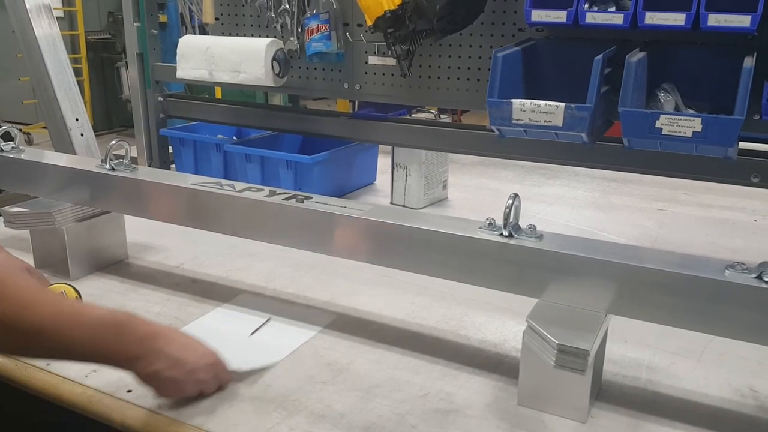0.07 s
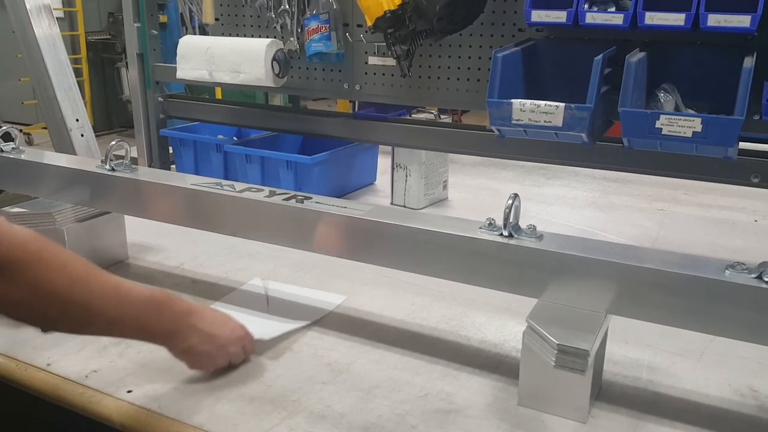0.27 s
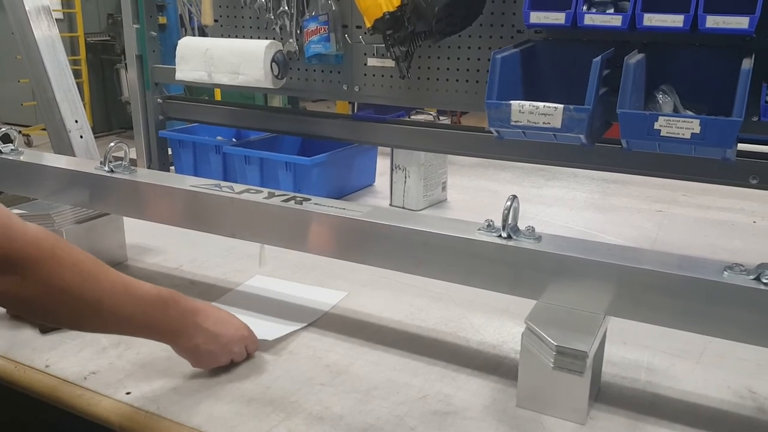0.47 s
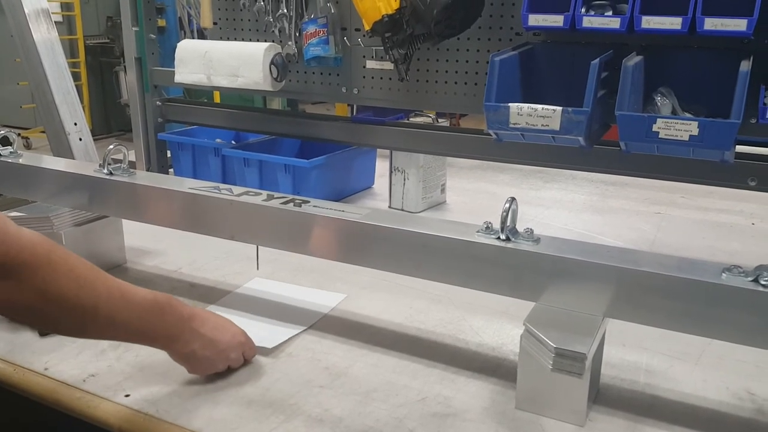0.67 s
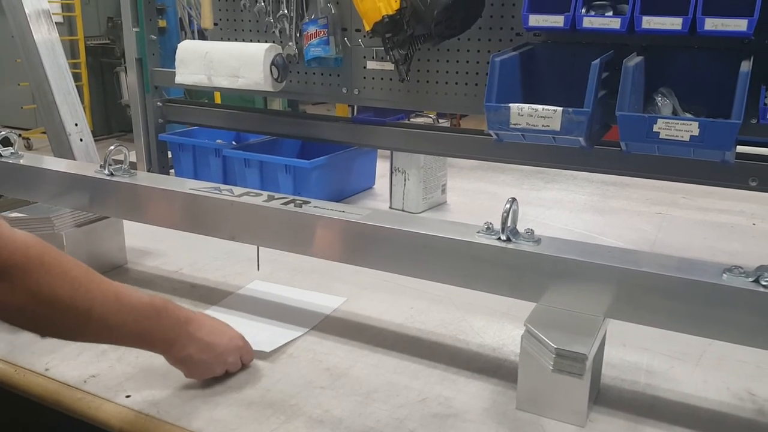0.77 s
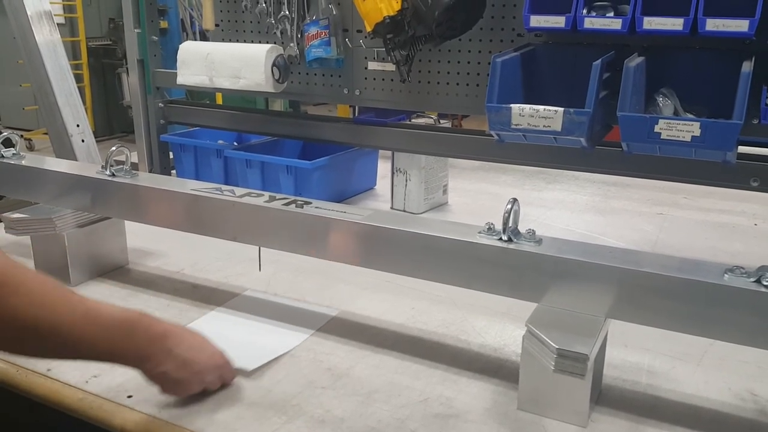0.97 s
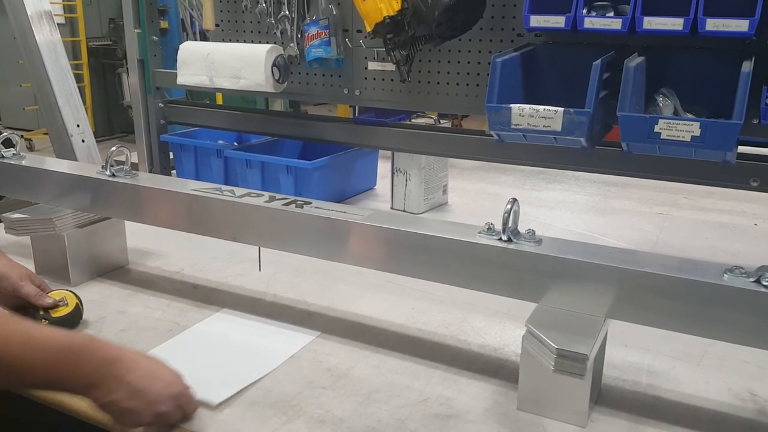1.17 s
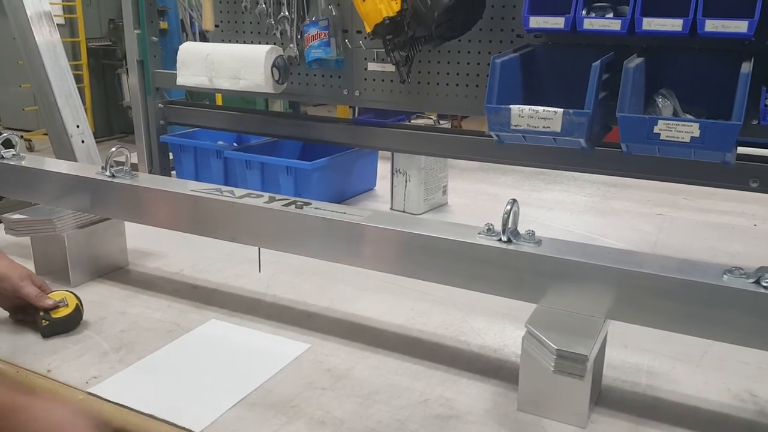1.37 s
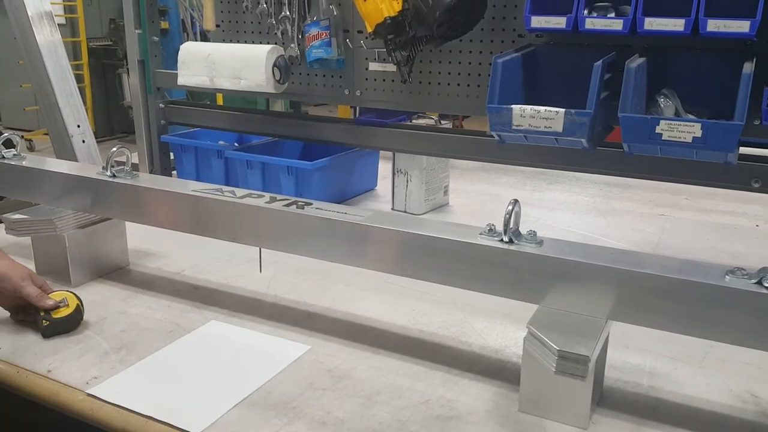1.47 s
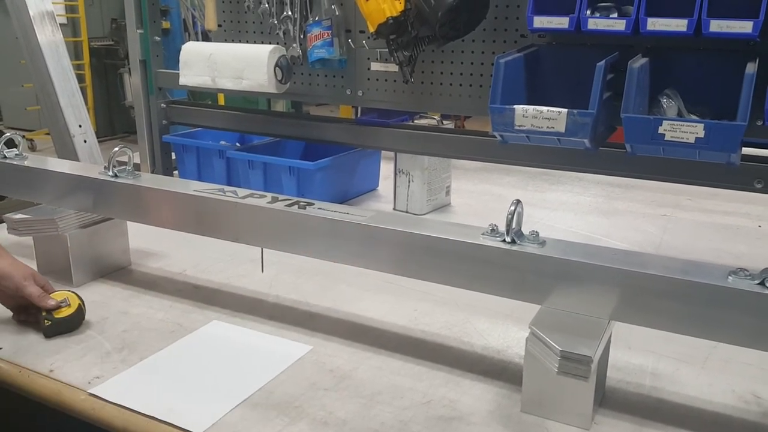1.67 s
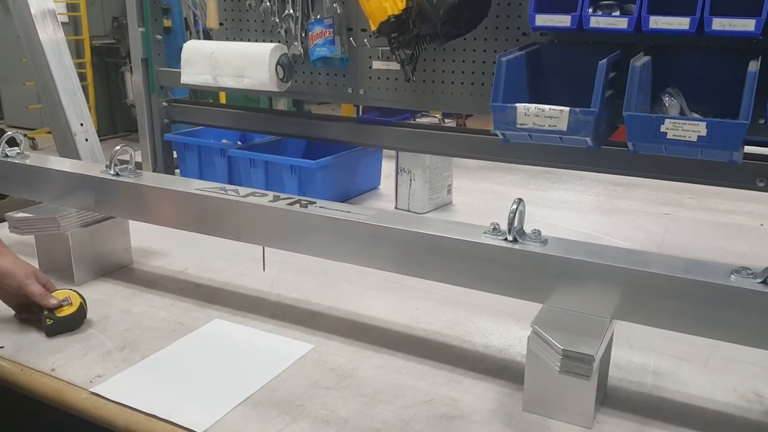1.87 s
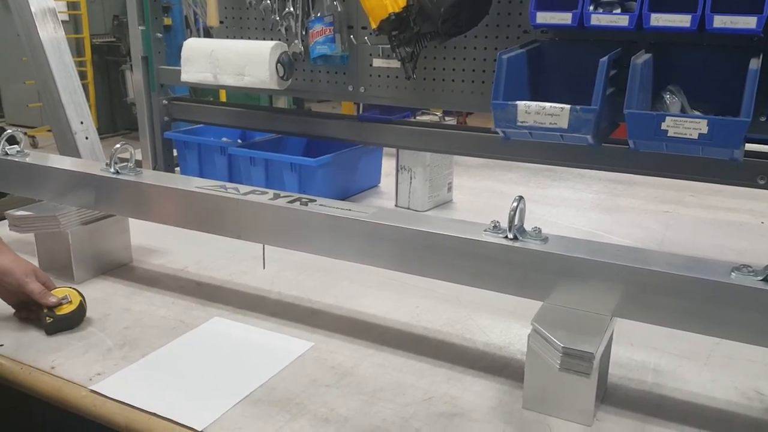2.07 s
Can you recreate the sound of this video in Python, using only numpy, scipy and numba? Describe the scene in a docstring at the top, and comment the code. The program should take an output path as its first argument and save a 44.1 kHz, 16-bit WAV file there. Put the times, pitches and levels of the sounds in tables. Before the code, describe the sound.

A steel nail snaps onto a magnet at 0.4 s: one very loud, bright metallic crack, slightly flattened, with short beam and nail ringing and workshop echo fading over about half a second. Before it, paper slides, hisses and crinkles. Afterwards the sound is ducked; faint paper rubbing until 1.5 s, a small tap near 1.65, returning ventilation and electrical hum, and a soft low rumble from 1.9.

```python
"""Inside a workshop with electrical hum and ventilation, a sheet of paper slides on the bench: filtered noise.
It lifts a steel nail, with swishes and crinkles in noise bands, until the nail jumps onto a magnet.
The snap is a noise crack with sines for nail and beam; surfaces near and far answer with reflections and echo.
The recorder flattens the peaks and ducks; its gain recovers slowly while the paper is laid down.
Last comes a low rumble of wavering sines."""
import sys
import numpy as np
from scipy import signal
from scipy.fft import rfft, irfft
from scipy.io import wavfile
from numba import njit

SR = 44100
rng = np.random.default_rng(int(sys.argv[2]) if len(sys.argv) > 2 else 0)


def log_audio(samples):
    """Write samples as a 16-bit WAV file to the path given in sys.argv[1]."""
    # one column per channel
    frames = np.atleast_2d(samples).T
    # limit to full scale, then quantise
    limited = np.clip(frames, -1, 1)
    pcm = np.round(limited * 32767).astype(np.int16)
    wavfile.write(sys.argv[1], SR, pcm)


N = 93359  # samples

# All levels are those ahead of the recorder; density/dB is a relative level per Hz.
# Electrical hum: [f/Hz, rms level/dB]
HUM_PARTIALS = [(60, -49.5), (120, -54.5), (240.1, -48), (300, -66), (360, -65), (480, -64), (720, -72)]
HUM_WAVER_DB = .25
# Spectrum of the ventilation: [f/Hz, density/dB]
AIR_COLOUR = [(20, -2), (50, 3.5), (75, 9), (120, 3), (170, -2.5), (300, -7.5), (480, -7), (750, -12.5),
              (1500, -14), (2600, -18), (5000, -27.5), (10000, -30.5), (15500, -38)]
AIR_DB, AIR_WAVER_DB = -50.5, .6

# Paper sliding on the bench: [t/s, level/dB], and its spectrum: [f/Hz, density/dB]
SLIDE_LEVELS = [(0, -47), (.06, -48), (.13, -44.5), (.22, -47), (.31, -49), (.38, -56.5), (.8, -48),
                (1.0, -47.5), (1.17, -51.5), (1.25, -55), (1.35, -67), (1.45, -67.5)]
SLIDE_SPECTRUM = [(300, -10.5), (1000, -2.5), (2600, 0), (4000, -2), (4800, -5), (8000, -12.5),
                  (15500, -22.5)]
# Hiss of paper rubbing: [t/s, level/dB], and its spectrum: [f/Hz, density/dB]
HISS_LEVELS = [(0, -52), (.03, -46), (.1, -47), (.19, -40), (.3, -44), (.37, -54), (.8, -74), (.92, -54),
               (1.01, -57), (1.05, -44.5), (1.2, -54), (1.26, -58.5), (1.37, -61.5), (1.46, -79)]
HISS_SPECTRUM = [(3000, -24.5), (6000, -12), (9000, -7.5), (11500, -1.5), (13500, 1.5), (14500, -1.5),
                 (15500, -5.5)]
SLIP_PER_S, SLIP_SCATTER_DB = 6200, 1.5
# Soft swishes of paper and hand over the bench:
# [centre t/s, level/dB, centre f/Hz, width/octaves, half length/s]
SWISH_EVENTS = [(0.019, -47, 2600, 0.21, 0.056), (0.148, -48.5, 3800, 0.17, 0.067),
                (1.126, -51.5, 3702, 0.24, 0.079), (1.361, -58.5, 5598, 0.7903, 0.083),
                (1.454, -59, 1200, 0.92, 0.045), (1.69, -55.5, 1330, 0.79, 0.12)]
# Crinkles of paper and small taps: [start t/s, level/dB, centre f/Hz, width/octaves, t60/s]
TICK_EVENTS = [(.100, -33.5, 2900, 0.52, 0.05875), (0.107, -26, 3740, 0.97, 0.015),
               (0.133, -32, 12500, 0.34, 0.013), (.212, -25.5, 13300, 0.18, .012),
               (1.208, -43, 9780, 0.32, 0.049), (1.387, -46, 8390, 0.59, .04),
               (1.652, -40.5, 1030, 0.48, 0.052)]

SNAP_S = .4092  # the nail meets the magnet
# Crack of the contact: [f/Hz, density/dB]
CRACK_COLOUR = [(60, -32), (250, -21), (750, -27.5), (1200, -19.5), (1700, -4), (2300, -10), (3000, -1),
                (3700, 0), (5000, -12), (8000, -6.5), (11000, -11), (15500, -16)]
CRACK_DB, CRACK_T60_S, CRACK_RISE_S = 6.5, .06, .00027
# Dull knock of the beam on its supports: [f/Hz, level/dB, t60/s]
KNOCK_MODES = [(235, -14, .04), (400, -18, .03), (600, -10, .035), (910, -15, .06)]
# Modes of the beam: [f/Hz, relative strike level/dB, level lingering in the room/dB, lingering t60/s]
BEAM_MODES = [(1492, -7, -21, .5), (1660, -6, -18, .65), (1840, -3, -22, .5), (2092, -14, -11, .35),
              (2424, -16, -12, .3), (2746, -11, -18, .5), (2895, 0, -15, .42), (3005, -11, -15, .42),
              (3220, -4, -16, .38), (3470, -3, -17, .4), (3536, -10, -15, .42), (3603, -6, -8, .38),
              (3638, -10, -16, .42), (3802, -1, -18, .5)]
BEAM_DB, BEAM_T60_S = 1, .07  # gain and decay of the strike
# Modes of the nail on the magnet: columns as for the beam
NAIL_MODES = [(6572, -2, -26, .35), (6828, -3, -23, .35), (7290, 1, -25, .35), (7541, -1, -20, .55),
              (8346, 0, -24, .3), (9755, -3, -23, .28), (10200, -5, -15, .25), (10526, -5, -25, .28),
              (10820, -5, -24, .3), (12720, -5, -22, .22)]
NAIL_DB, NAIL_T60_S = -7, .09
# First reflections off the bench back and the wall: [delay t/s, level/dB]
FIRST_REFLECTIONS = [(0.0168, -21), (.028, -17.5), (.0435, -13.5)]

# Echo of the workshop: [f/Hz, density/dB]
ECHO_COLOUR = [(100, -32), (400, -25.5), (750, -24.5), (950, -14.5), (1300, -11), (1650, -4), (2500, -3),
               (3700, 1.5), (4800, -9), (7500, -5), (11000, -11.5), (15500, -20)]
# Late decay of that echo: [f/Hz, t60/s]
ECHO_DECAY = [(200, .55), (900, .55), (1700, 0.86), (3500, 0.79), (6000, 0.65), (9000, .54), (15000, 0.4)]
ECHO_DB, ECHO_RISE_S = -8, .01
# Near walls and shelves; level relative to the late echo
EARLY_DB, EARLY_T60_S, EARLY_RISE_S = 15.5, .23, .03

# Resonances of the low rumble: [start t/s, attack/s, hold/s, release/s, f/Hz, level/dB]
RUMBLE_MODES = [(1.9, .035, .1, .08, 103, -38), (1.91, .03, .07, .08, 78, -43),
                (1.9, .02, .1, .08, 140, -50), (1.9, .01, .07, .02, 395, -50)]
RUMBLE_WANDER = .07  # spread of the pitch knots, as a fraction

# Recorder: gain control, overload, filters
AGC_THRESHOLD_DB, AGC_DEPTH_DB = -4.5, -12.5
AGC_ATTACK_S, AGC_HOLD_S, AGC_RELEASE_S = .0089, .58, .31
CLIP_KNEE = 5  # higher bends later and harder
LOW_CUT_HZ, TOP_HZ = 150, 15650


def undb(db):
    """Decibels to gain."""
    return 10 ** (np.asarray(db) / 20)


def unit(x):
    """Scale to rms 1."""
    return x / np.sqrt(np.mean(x ** 2))


def seconds():
    """The time of every sample."""
    return np.arange(N) / SR


def on_log(points, hz):
    """Read (f/Hz, value) points on a log-frequency axis."""
    f, v = np.array(points, float).T
    return np.interp(np.log(np.maximum(hz, 1)), np.log(f), v)


def colour(x, points):
    """Give a sound a spectrum of (f/Hz, level/dB) points, losing what lies below 20 Hz; rms 1."""
    hz = np.fft.rfftfreq(N, 1 / SR)
    low_cut = hz ** 2 / (hz ** 2 + 20 ** 2)
    return unit(irfft(rfft(x) * undb(on_log(points, hz)) * low_cut, N))


def band_noise(hz, octaves):
    """Noise in a bell-shaped band; rms 1."""
    away = np.log2(np.maximum(np.fft.rfftfreq(N, 1 / SR), 1) / hz) / octaves
    return unit(irfft(rfft(rng.standard_normal(N)) * np.exp(-away ** 2 / 2), N))


def fade(start, t60, rise):
    """Envelope of a blow: quick rise, exponential decay by 60 dB in t60."""
    age = np.maximum(seconds() - start, 0)
    return (1 - np.exp(-age / rise)) * np.exp(-np.log(1000) * age / t60)


def walk(rate):
    """Random wander: straight lines between random knots of spread 1, rate knots a second."""
    knots = rng.standard_normal(256)
    return np.interp(seconds() * rate, np.arange(len(knots)), knots)


def tone(hz):
    """A sine of random phase."""
    return np.sin(2 * np.pi * (hz * seconds() + rng.random()))


def workshop():
    """The place itself: steady mains partials, slightly wavering, over the broad noise of ventilation."""
    hum = 0
    for hz, db in HUM_PARTIALS:
        hum = hum + np.sqrt(2) * undb(db + HUM_WAVER_DB * walk(12)) * tone(hz)
    air = colour(rng.standard_normal(N), AIR_COLOUR)
    return hum + undb(AIR_DB + AIR_WAVER_DB * walk(2.2)) * air


def rub(levels, spectrum, flutter_db):
    """Dense tiny slips of paper fibres, following a level curve."""
    happens = rng.random(N) < SLIP_PER_S / SR
    strength = rng.standard_normal(N) * undb(SLIP_SCATTER_DB * rng.standard_normal(N))
    level = np.interp(seconds(), *np.array(levels).T) + flutter_db * walk(86)
    return colour(happens * strength, spectrum) * undb(level)


def paper():
    """The sheet slides, lifts the nail and is laid down again: a duller slide and a bright hiss."""
    slide = rub(SLIDE_LEVELS, SLIDE_SPECTRUM, flutter_db=1.2)
    hiss = rub(HISS_LEVELS, HISS_SPECTRUM, flutter_db=.24)
    return slide + hiss


def swishes():
    """Brief swells of rubbing: noise bands that rise and fall in a bell shape."""
    out = 0
    for s, db, hz, width, half in SWISH_EVENTS:
        swell = np.exp(-((seconds() - s) / half) ** 2)
        out = out + undb(db) * band_noise(hz, width) * swell
    return out


def ticks():
    """Short crinkles and taps: noise bands with a sudden start and a quick decay."""
    out = 0
    for s, db, hz, width, t60 in TICK_EVENTS:
        out = out + undb(db) * band_noise(hz, width) * fade(s, t60, rise=.00063)
    return out


def struck(modes, t60):
    """Modes set off by the snap, dying quickly."""
    ring = sum(undb(db) * tone(hz) for hz, db, _, _ in modes)
    return fade(SNAP_S, t60, CRACK_RISE_S) * ring


def lingering(modes):
    """The same frequencies ringing on in the room."""
    return sum(undb(db) * tone(hz) * fade(SNAP_S, t60, ECHO_RISE_S) for hz, _, db, t60 in modes)


def snap():
    """The nail hits the magnet: a bright crack and a knock, beam and nail ring, near surfaces throw it back."""
    crack = undb(CRACK_DB) * colour(rng.standard_normal(N), CRACK_COLOUR)
    crack = crack * fade(SNAP_S, CRACK_T60_S, CRACK_RISE_S)
    knock = sum(undb(db) * tone(hz) * fade(SNAP_S, t60, CRACK_RISE_S) for hz, db, t60 in KNOCK_MODES)
    beam = undb(BEAM_DB) * struck(BEAM_MODES, BEAM_T60_S)
    nail = undb(NAIL_DB) * struck(NAIL_MODES, NAIL_T60_S)
    bright = crack + beam + nail  # the knock is not reflected
    back = sum(undb(db) * np.roll(bright, int(delay * SR)) for delay, db in FIRST_REFLECTIONS)
    return bright + knock + back + lingering(BEAM_MODES) + lingering(NAIL_MODES)


def echo():
    """Diffuse tail in half-octave bands: strong early reflections, then a late fade, slowest in the mids."""
    spectrum = rfft(colour(rng.standard_normal(N), ECHO_COLOUR))
    centres = 125 * 2 ** np.arange(0, 7.5, .5)
    hz_axis = np.maximum(np.fft.rfftfreq(N, 1 / SR), 1)
    place = np.interp(np.log(hz_axis), np.log(centres), np.arange(len(centres)))
    early = undb(EARLY_DB) * fade(SNAP_S, EARLY_T60_S, EARLY_RISE_S)
    out = 0
    for k, hz in enumerate(centres):
        overlap = np.maximum(1 - abs(place - k), 0)  # triangular bands that sum to 1
        band = irfft(spectrum * overlap, N)
        late = fade(SNAP_S, on_log(ECHO_DECAY, hz), ECHO_RISE_S)
        out = out + band * np.hypot(early, late)
    return undb(ECHO_DB) * out


def rumble():
    """A soft, unsteady rumble, as of something shifted against the bench: sines of wandering pitch."""
    out = 0
    for start, attack, hold, release, hz, db in RUMBLE_MODES:
        corners = start + np.cumsum([0, attack, hold, release])
        swell = np.interp(seconds(), corners, [0, 1, 1, 0])
        cycles = np.cumsum(hz * (1 + RUMBLE_WANDER * walk(60))) / SR
        out = out + np.sqrt(2) * undb(db) * swell * np.sin(2 * np.pi * cycles)
    return out


def scene():
    """Everything that reaches the microphone, on one channel."""
    return (workshop() + paper() + swishes() + ticks() + snap() + echo() + rumble())[None]


@njit
def gain_control(x, threshold, low, attack, hold, release):
    """A loud peak pulls the gain down; it is held, then creeps back."""
    out, gain, wait = np.empty(len(x)), 1., 0.
    for i in range(len(x)):
        wait = hold if abs(x[i]) > threshold else wait - 1 / SR
        gain += (low - gain) / (attack * SR) if wait > 0 else (1 - gain) / (release * SR)
        out[i] = gain * x[i]
    return out


def record(dry):
    """The recorder ducks after the snap, flattens its peaks, thins the bass and cuts the top."""
    threshold, low = float(undb(AGC_THRESHOLD_DB)), float(undb(AGC_DEPTH_DB))
    x = gain_control(dry[0], threshold, low, AGC_ATTACK_S, AGC_HOLD_S, AGC_RELEASE_S)
    x = x / (1 + abs(x) ** CLIP_KNEE) ** (1 / CLIP_KNEE)
    low_cut = signal.butter(2, LOW_CUT_HZ, "highpass", fs=SR, output="sos")
    top_cut = signal.ellip(10, .1, 70, TOP_HZ, fs=SR, output="sos")
    return signal.sosfilt(top_cut, signal.sosfilt(low_cut, x))[None]


dry = scene()
out = record(dry)
log_audio(out)
```